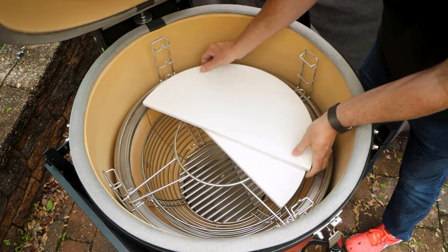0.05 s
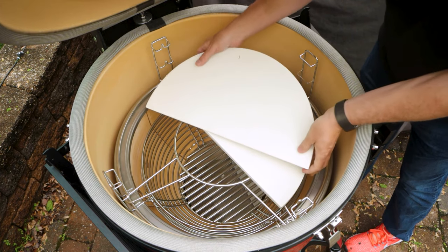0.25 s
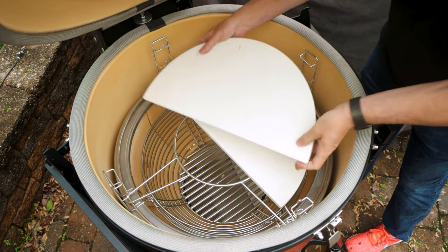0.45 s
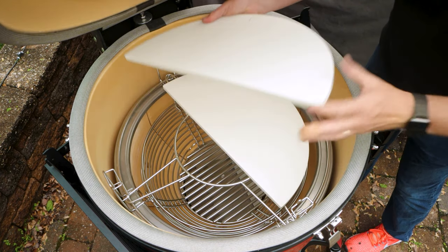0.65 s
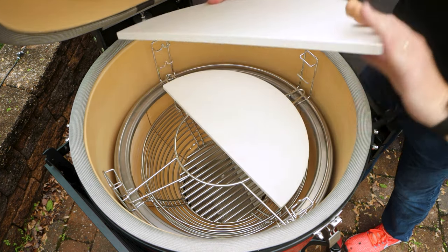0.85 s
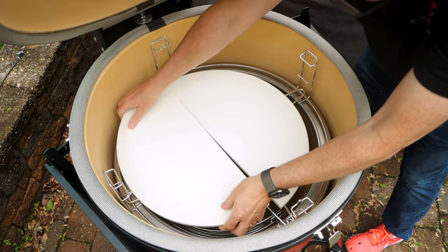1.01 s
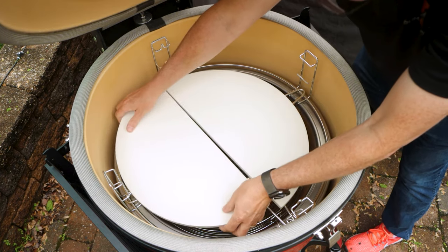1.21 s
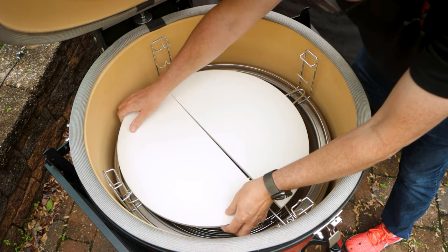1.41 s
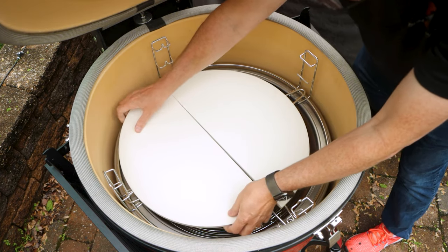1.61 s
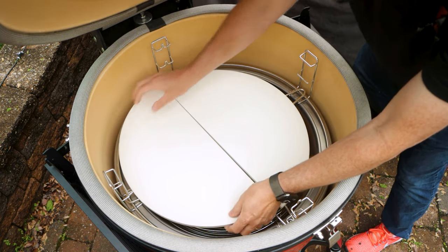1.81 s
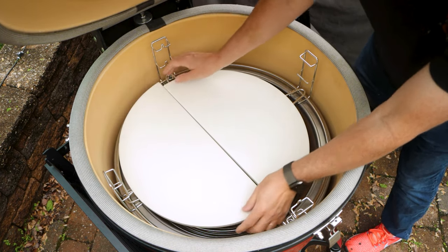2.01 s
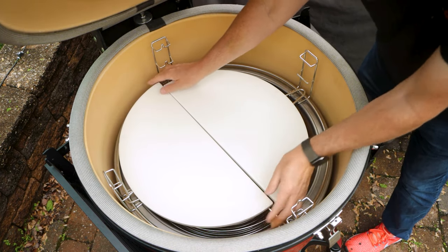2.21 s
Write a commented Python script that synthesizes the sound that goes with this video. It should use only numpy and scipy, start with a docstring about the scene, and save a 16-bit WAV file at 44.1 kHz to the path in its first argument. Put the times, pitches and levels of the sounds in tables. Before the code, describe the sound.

Ceramic plates clunk together with a brief ring as one is lifted. It is set down on a steel grill rack and pushed in two gritty, singing scrapes, then light taps. Close microphone, outdoors.

```python
"""Two half-moon ceramic plates lie on the steel rack of a round ceramic grill, outdoors.
The upper one clunks on the lower as it is lifted, and the lower rocks back. After dry ticks and a faint
squeak it is set down and pushed into place in two gritty, singing stick-slip scrapes; light taps follow.
Throughout, plates and rack ring, the deep bowl echoes and hums, and a close mono microphone rounds
the loudest peaks."""
import sys
import numpy as np
from scipy import signal
from scipy.fft import rfft, irfft, next_fast_len
from scipy.io import wavfile
from scipy.ndimage import uniform_filter1d

SR = 44100
rng = np.random.default_rng(int(sys.argv[2]) if len(sys.argv) > 2 else 0)


def materialize(psi):
    """Save the field psi as 16-bit PCM at rate SR to the path in sys.argv[1].

    A 1-D psi becomes a single channel; in a 2-D psi each row is a channel.
    """
    bounded = np.clip(np.atleast_2d(psi).T, -1, 1)
    quanta = np.round(bounded * 32767).astype(np.int16)
    wavfile.write(sys.argv[1], SR, quanta)


N = 103635
TIME = np.arange(N) / SR


def amp(db):
    """Decibels to gain."""
    return 10 ** (np.asarray(db) / 20)


def unit(x):
    """Scale to rms 1."""
    return x / np.sqrt(np.mean(x ** 2))


def through(x, response):
    """Play x through a response of unit energy."""
    return signal.fftconvolve(x, response / np.linalg.norm(response))[:N]


def late(x, start):
    """Delay x to a start time in seconds."""
    return np.concatenate([np.zeros(int(max(start, 0) * SR)), x])[:N]


def cut(x, hz, kind="low", order=2):
    """Low-pass or high-pass."""
    return signal.sosfilt(signal.butter(order, np.clip(hz, 10, .47 * SR), kind, fs=SR, output="sos"), x)


def noise(colour):
    """Noise of rms 1, shaped by an EQ curve of (frequency [Hz], level [dB]) points."""
    hz, db = np.array(colour, float).T
    size = next_fast_len(N)
    f = np.maximum(np.fft.rfftfreq(size, 1 / SR), 1)
    gain = amp(np.interp(np.log(f), np.log(hz), db)) * np.minimum(f / hz[0], 1)
    return unit(irfft(gain * np.exp(2j * np.pi * rng.random(len(f))), size)[:N])


def wobble(smooth_s):
    """Smoothed random modulation of rms 1."""
    return unit(uniform_filter1d(rng.standard_normal(N), int(smooth_s * SR)))


def dense(colour, t60, top_t60):
    """Countless close overtones dying away; t60 [s] holds at 500 Hz, top_t60 at 8 kHz."""
    rest, out = noise(colour), 0
    for octave in range(5):
        lowpass = signal.butter(3, 707 * 2 ** octave, fs=SR, output="sos")
        band = signal.sosfiltfilt(lowpass, rest) if octave < 4 else rest
        band_t60 = t60 * (top_t60 / t60) ** (octave / 4)
        out = out + band * 1e3 ** (-TIME / band_t60)
        rest = rest - band
    return out


def ring(modes):
    """Struck modes that start at rms 1 and decay."""
    t = TIME[:SR]
    out = sum(amp(db) * np.sin(2 * np.pi * (hz * t + rng.random())) * 1e3 ** (-t / t60)
              for hz, db, t60 in modes)
    return np.pad(out, (0, N - SR)) / np.sqrt(sum(amp(db) ** 2 for _, db, _ in modes) / 2)


def resonate(force, modes):
    """Modes driven by a force share its energy by their levels."""
    out = 0
    for hz, db, t60 in modes:
        pole = np.exp((2j * np.pi * hz - np.log(1000) / t60) / SR)
        out = out + amp(db) * unit(signal.lfilter([1], [1, -2 * pole.real, abs(pole) ** 2], force + 1e-18))
    return unit(out) * np.std(force)


def patchy(x, depth_db=3.5, spacing_hz=46.36):
    """Boost and dip narrow bands of the treble at random, as many close wire resonances do."""
    size = next_fast_len(2 * N)
    f = np.fft.rfftfreq(size, 1 / SR)
    ripple = np.interp(f / spacing_hz, np.arange(SR // 16), rng.standard_normal(SR // 16))
    treble = np.clip(f / 2000 - .5, 0, 1)
    cepstrum = irfft(np.log(amp(depth_db * np.clip(ripple, -2, 1.5) * treble)), size)
    cepstrum[size // 2:] = 0  # minimum phase: no ringing ahead of the hit
    coloured = irfft(rfft(x, size) * np.exp(2 * rfft(cepstrum)), size)[:N]
    return coloured * np.std(x) / np.std(coloured)


def onset(build_s):
    """Exponential fade-in that softens an attack."""
    return 1 - np.exp(-TIME / build_s)


def stroke(start, length, attack_s=0.012, release_s=0.0055):
    """Attack, hold, release envelope."""
    return np.clip((TIME - start) / attack_s, 0, 1) * np.exp(-np.maximum(TIME - start - length, 0) / release_s)


def slips(per_s, spread_db):
    """Irregular stick-slip clicks of uneven size, rms 1."""
    size = amp(spread_db * np.clip(rng.standard_normal(N), -2, 2)) * rng.choice([-1, 1], N)
    return unit((rng.random(N) < per_s / SR) * size)


def follow(curve):
    """Fader ride along (time [s], level [dB]) points."""
    return amp(np.interp(TIME, *np.array(curve).T))


# outdoor ambience EQ (frequency [Hz], relative level [dB])
AIR_EQ = [(25, -51), (113, -13), (410, -13), (804, -39), (970, -47), (2170, -42), (15500, -43.5)]
def outdoor_air(level_db=-55):
    """A steady bed of outdoor air, mostly low rumble."""
    return amp(level_db) * noise(AIR_EQ)


# air resonances of the bowl (frequency [Hz], relative level [dB], t60 [s])
BOWL_AIR_MODES = [(113.73, 0, 1), (127.96, -2.5, 0.63), (161, -22, 0.1), (238, -18, 0.59)]
# fader ride of the hum (time [s], relative level [dB])
HUM_RIDE = [(0.0, -37), (0.19, -41), (0.32, -29), (1.07, -59), (1.1, -31), (1.68, -48), (1.75, -27),
            (1.86, -32), (2.2, -40.5), (2.35, -35)]
# hollow murmur of the handled plates (frequency [Hz], relative level [dB])
MURMUR_EQ = [(150, -0.5), (330, -10), (450, 1), (610, 2), (780, -6), (960, 0.5), (1300, -8.5),
             (2200, -12.5), (4000, -32), (12000, -47)]
# fader ride of the murmur (time [s], level [dB])
MURMUR_RIDE = [(0, -46.5), (.18, -47), (.6, -42.5), (.85, -56), (1.07, -55), (1.35, -35), (1.66, -48),
               (2.05, -34), (2.35, -41.5)]
def bowl_hum(even_s=0.11, trim_db=-2.5):
    """Handling keeps the air in the bowl humming under a hollow murmur."""
    hum = signal.fftconvolve(rng.standard_normal(N + SR), ring(BOWL_AIR_MODES)[:SR])[SR:SR + N]
    hum = cut(cut(hum, 450), 120, "high")
    steady_hum = hum / np.sqrt(uniform_filter1d(hum ** 2, int(even_s * SR)))
    return amp(trim_db) * steady_hum * follow(HUM_RIDE) + noise(MURMUR_EQ) * follow(MURMUR_RIDE)


# reverb EQ of the bowl (frequency [Hz], relative level [dB])
ECHO_EQ = [(80, 0), (240, 0.5), (330, 9), (600, 6), (1000, -10), (2000, -1), (4000, -8.5), (8000, -15.5),
           (15000, -11)]
# tones that linger in the bowl (frequency [Hz], relative level [dB], t60 [s])
TAIL_MODES = [(239.5, -4, 1.35), (441, -3, 1.1), (592.2, 1, 1.2), (627, 1, 1.4), (970, -2, 1.1),
              (1899, -7, 1.1)]
def bowl_echo(contacts, echo_db=-19.5, linger_db=-18):
    """The deep bowl answers each contact with a short reverb and a few long tones."""
    echo = through(contacts, dense(ECHO_EQ, t60=0.5, top_t60=0.65) * onset(0.02))
    return amp(echo_db) * echo + amp(linger_db) * resonate(contacts, TAIL_MODES)


# resonances of the squeak (frequency [Hz], relative level [dB], t60 [s])
SQUEAK_TONES = [(2654, -2, .15), (3623, 0, .25), (5787, -9, .15)]
def squeak(level_db=-62):
    """A faint thin squeak while the plate is lowered."""
    return amp(level_db) * stroke(start=.885, length=.07) * resonate(rng.standard_normal(N), SQUEAK_TONES)


# tick cues (time [s], level [dB])
TICK_CUES = [(0.7371, -31), (0.745, -36.5), (1.045, -42.5)]
# tick EQ (frequency [Hz], relative level [dB])
TICK_EQ = [(300, -21), (2000, 3), (6000, -8.5), (15000, -9)]
def ticks(decay_s=0.00078, tail_db=-16, tail_s=0.015):
    """Small dry ticks: snaps of noise with a faint tail."""
    envelope = np.exp(-TIME / decay_s) + amp(tail_db) * np.exp(-TIME / tail_s)
    return sum(amp(db) * late(envelope * noise(TICK_EQ), start) for start, db in TICK_CUES)


# light slides of glaze and hands (time [s], length [s], level [dB])
RUB_CUES = [(-.05, 0.14, -61), (0.074, 0.17, -53), (0.306, 0.12, -49.5), (0.529, 0.0095, -55),
            (0.587, 0.042, -58), (0.944, .02, -58.5), (0.977, 0.13, -61), (1.332, 0.22, -48.5),
            (1.528, 0.08, -45.5), (1.61, 0.1, -49), (1.683, 0.18, -46)]
# EQ of their hiss (frequency [Hz], relative level [dB])
RUB_EQ = [(300, -12), (1000, -6), (2500, -9.5), (5200, 1), (7000, -6), (11000, -3), (15500, -9.5)]
def rubs(ring_db=-14, scratch_db=3, scratch_s=0.013):
    """Light sliding hisses in small uneven scratches and faintly rings the low modes of plate and rack."""
    push = sum(amp(db) * stroke(start, length) for start, length, db in RUB_CUES)
    scratches = unit(amp(scratch_db * wobble(scratch_s)))
    force = push * scratches * slips(per_s=1800, spread_db=3)
    hiss = through(force, dense(RUB_EQ, t60=0.15, top_t60=0.048))
    low_modes = [mode for mode in PLATE_ON_RACK_MODES if mode[0] < 2500]
    return hiss + amp(ring_db) * resonate(force, low_modes)


# overtone EQ of plate and rack (frequency [Hz], relative level [dB])
RACK_EQ = [(35, -61), (60, -20), (107, -21), (350, -21), (600, -12.5), (829, -17), (931, -13.5),
           (1070, -17), (1380, -14.5), (2150, -18.5), (5200, -18), (11200, -24.5), (15500, -28.5)]
def rack_overtones(t60=0.31, top_t60=0.12):
    """Dense ringing of plate and rack, different for each contact point."""
    return patchy(dense(RACK_EQ, t60, top_t60))


# the lower plate lands on the rack (time [s], relative level [dB], low-pass [Hz])
DROP_CUES = [(.413, -22, 2300), (.42, -24.5, 3350), (0.462, -30, 2860)]
# ring of the lower plate (frequency [Hz], relative level [dB], t60 [s])
LOWER_PLATE_MODES = [(556, -9, .5), (970, -3, 0.4), (1590, -1, 0.25), (2053, -4, 0.18), (2470, -10, 0.1),
                     (2735, -5, 0.12)]
def drops(clatter_db=2, bass_hz=500):
    """Relieved of the weight, the lower plate rocks back with a dull clack."""
    tone = ring(LOWER_PLATE_MODES)
    clatter = cut(rack_overtones(t60=0.41), bass_hz, "high", order=1)
    clack = tone + amp(clatter_db) * clatter
    return sum(amp(db) * late(cut(clack, hz), start) for start, db, hz in DROP_CUES)


# edge slips (time [s], relative level [dB], low-pass [Hz], ping mix [dB])
CLINK_CUES = [(1.42, -25.5, 3100, 0), (1.727, -21.5, 14000, 3), (1.8545, -20, 9050, -0.5)]
# ping of a flicked rack wire (frequency [Hz], relative level [dB], t60 [s])
PING_MODES = [(2420, -9, .14), (3010, -6, .14), (4430, -8, .12), (5210, -4, .12), (5310, -1, .13)]
def clinks(bass_hz=260, build_s=0.0014):
    """A plate's edge slips off a wire with a clack, and the wire pings."""
    out = 0
    for start, db, hz, ping_db in CLINK_CUES:
        clatter = cut(rack_overtones(t60=0.57, top_t60=0.066), bass_hz, "high", order=1)
        hit = onset(build_s) * (amp(ping_db) * ring(PING_MODES) + clatter)
        out = out + amp(db) * late(cut(hit, hz), start)
    return out


# a plate touches the rack (time [s], relative level [dB], low-pass [Hz], high-pass [Hz])
TAP_CUES = [(.192, -24, 705, 197), (0.587, -36.5, 2780, 697), (1.0195, -40.5, 900, 300),
            (1.081, -12, 4200, 200), (1.432, -20.5, 4200, 340), (1.752, -21, 1810, 300),
            (2.11, -32, 3170, 300), (2.162, -30.5, 4660, 1200), (2.333, -38.5, 5900, 597)]
# ring of plate and rack together, also in rubs and scrapes (frequency [Hz], relative level [dB], t60 [s])
PLATE_ON_RACK_MODES = [(475, -10, .18), (600, -7, .25), (920, 0, .22), (955, -1, .3), (1378, -12, .3),
                       (2045, -9, .16), (3235, -11, .09), (4265, -10, .035), (5290, -7, .04),
                       (8660, -13, .2), (10417, -17, .14), (11720, -18, .1)]
def taps(build_s=0.0022, overtones_db=1, trim_db=-2):
    """Short knocks and taps on the rack, each with its own brightness and body."""
    hit = onset(build_s) * (amp(overtones_db) * rack_overtones() + ring(PLATE_ON_RACK_MODES))
    return amp(trim_db) * sum(amp(db) * late(cut(cut(hit, hz), bass_hz, "high", order=1), start)
                              for start, db, hz, bass_hz in TAP_CUES)


# the pushed plate sings (time [s], length [s], level [dB], pitch [Hz])
SING_CUES = [(1.112, .07, -17, 914), (1.885, .07, -23, 936)]
def sings(waver_hz=7, waver_s=0.0057, roughness=0.1):
    """Friction catches the plate's strongest mode: a rough, wavering tone."""
    waver, grip = wobble(waver_s), wobble(waver_s)
    out = 0
    for start, length, db, hz in SING_CUES:
        phase = 2 * np.pi * np.cumsum(hz + waver_hz * waver) / SR
        tone = unit((1 + roughness * grip) * np.sin(phase))
        out = out + amp(db) * stroke(start, length, attack_s=.02, release_s=.035) * tone
    return out


# short slides over the rack (time [s], length [s], level [dB], attack [s], sag [dB/s], low-pass [Hz])
SCRAPE_CUES = [(1.086, 0.024, -12, 0.0017, -22, 15700), (1.116, 0.025, -14.5, 0.0022, -22.5, 12000),
               (1.144, 0.034, -14, 0.0037, -53, 13700), (1.199, 0.022, -17.5, 0.0033, -77, 7940),
               (1.731, 0.018, -20.5, 0.0068, -69, 8400), (1.84, 0.0081, -26.5, 0.0044, -20, 5980),
               (1.855, 0.034, -13.5, 0.005, -33.5, 13000), (1.899, 0.035, -17, 0.006, -25.5, 10500),
               (1.945, 0.0094, -16.5, 0.0022, -62.5, 9400)]
def scrapes(bass_hz=90, ring_db=-2.5):
    """Ceramic sticks and slips on steel wire; each slide finds a new contact point with its own overtones."""
    grit, total_force = 0, 0
    for start, length, db, attack, sag, hz in SCRAPE_CUES:
        level = amp(db + sag * np.clip(TIME - start, 0, length))
        push = level * stroke(start, length, attack, release_s=0.0082)
        crackle = unit(push * slips(per_s=650, spread_db=7))
        force = cut(crackle * np.sqrt(np.mean(push ** 2)), hz)
        grit = grit + through(force, rack_overtones())
        total_force = total_force + force
    return cut(grit, bass_hz, "high") + amp(ring_db) * resonate(total_force, PLATE_ON_RACK_MODES)


# the upper plate knocks on the lower and rocks (time [s], relative level [dB], low-pass [Hz])
CLUNK_CUES = [(0.2105, 0.5, 3520), (0.2172, -6.5, 11000), (.229, -10, 9000), (0.2602, -24.5, 3040)]
# ring of the lifted plate (frequency [Hz], relative level [dB], t60 [s])
UPPER_PLATE_MODES = [(420, -8, .38), (500, -9, .35), (557, -4, .42), (640, -9, .33), (684, -7, .3),
                     (733, -2, .33), (781, -3, .26), (857, -2, .26), (972, -7, .42), (1046, -5, .2),
                     (1322, -9, .21), (1380, -4, .2), (1753, -4, .2), (1900, -4, .22)]
# EQ of its dense overtones (frequency [Hz], relative level [dB])
UPPER_PLATE_EQ = [(35, -46), (60, -63), (305, -21.5), (403, -13.5), (849, -5), (1200, -17.5), (1350, -11.5),
                  (1910, -17), (2150, -17.5), (7900, -21.5), (15500, -24)]
def clunk(ring_db=-5, clatter_db=-5, build_s=0.0029):
    """The first contact sets the plate's modes ringing; each contact adds a clatter of overtones."""
    attack = onset(build_s)
    body = amp(ring_db) * late(attack * ring(UPPER_PLATE_MODES), CLUNK_CUES[0][0])
    clatter = 0
    for start, db, hz in CLUNK_CUES:
        hit = attack * dense(UPPER_PLATE_EQ, t60=0.47, top_t60=0.15)
        clatter = clatter + amp(db + clatter_db) * late(cut(hit, hz), start)
    return body + patchy(clatter)


def scene():
    """All contacts sound inside the bowl, over its hum and the outdoor air; both channels are alike."""
    contacts = clunk() + drops() + taps() + clinks() + scrapes() + sings() + rubs() + squeak() + ticks()
    mix = contacts + bowl_echo(contacts) + bowl_hum() + outdoor_air()
    return np.array([mix, mix])


def record(dry):
    """The microphone thins the bass below 45 Hz, rounds the loudest peaks and cuts the top at 16 kHz."""
    thinned = cut(dry, 45, "high", order=1)
    rounded = thinned / (1 + thinned ** 4) ** (1 / 4)
    return signal.sosfilt(signal.ellip(10, .2, 80, 16000, fs=SR, output="sos"), rounded)


dry = scene()
out = record(dry)
materialize(out)
```